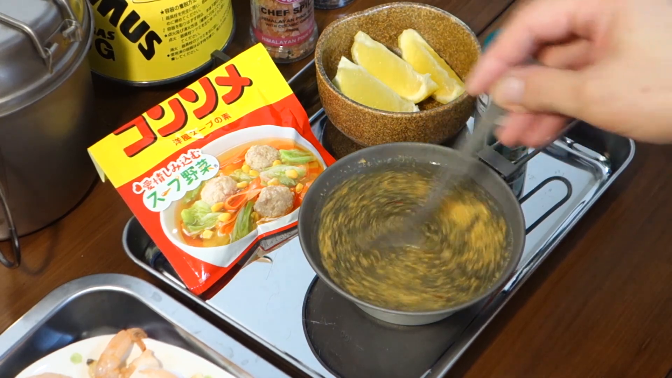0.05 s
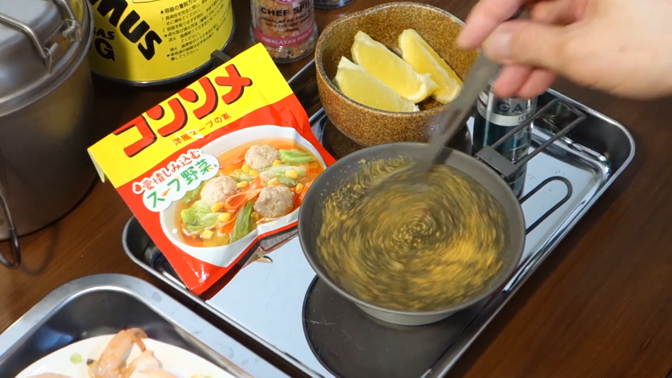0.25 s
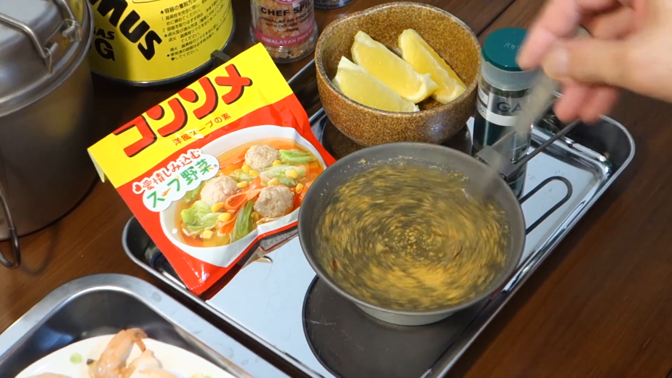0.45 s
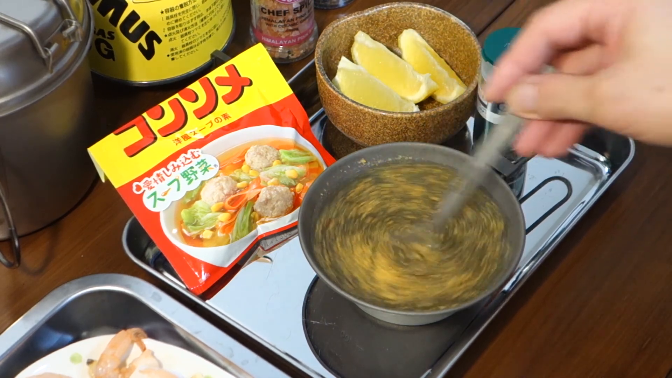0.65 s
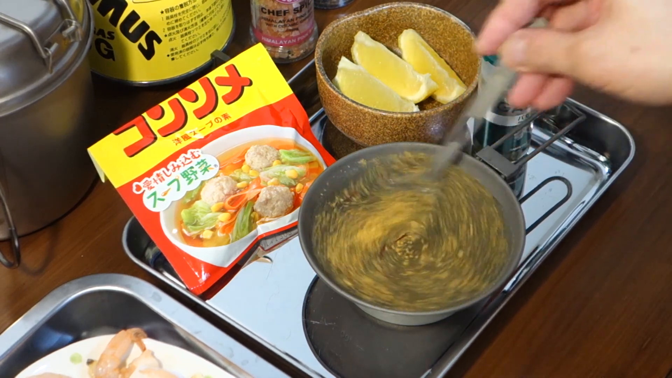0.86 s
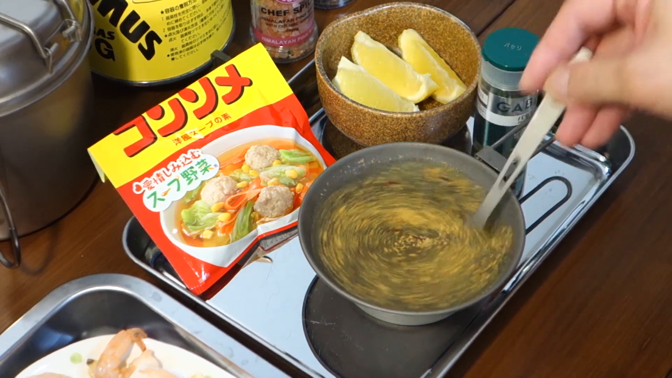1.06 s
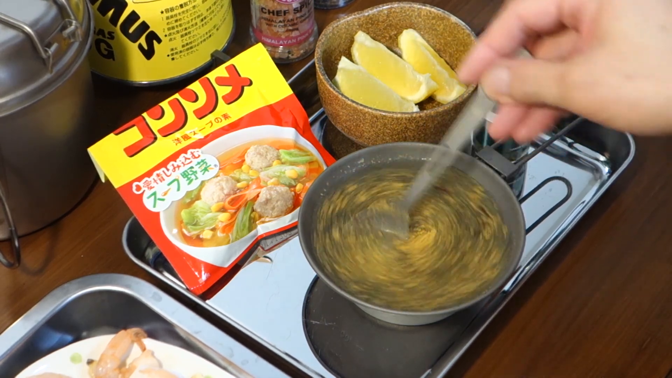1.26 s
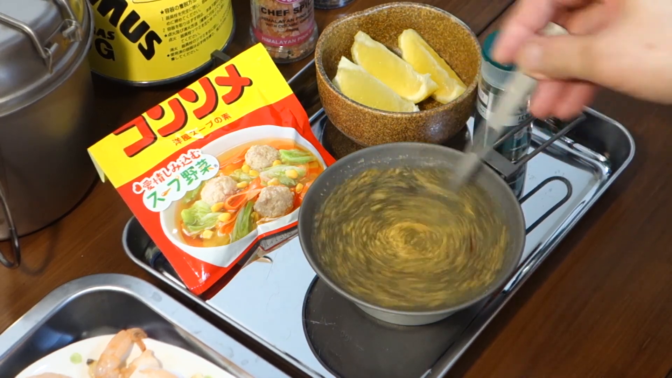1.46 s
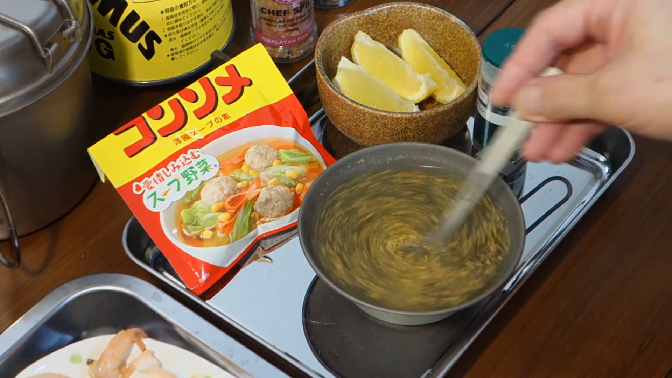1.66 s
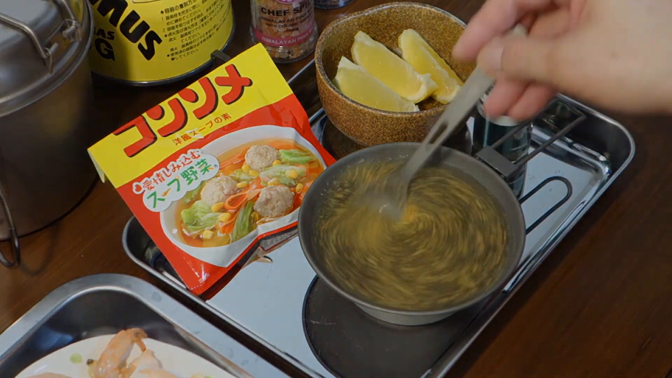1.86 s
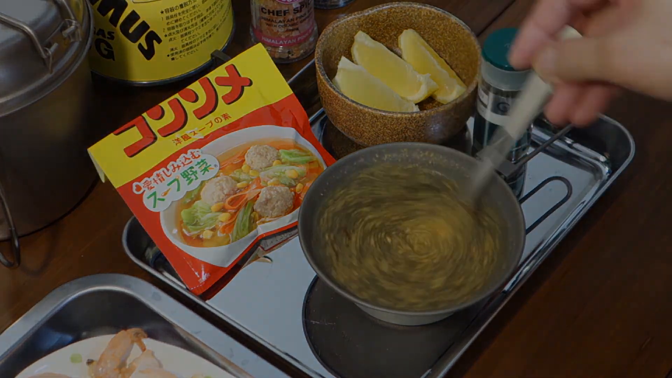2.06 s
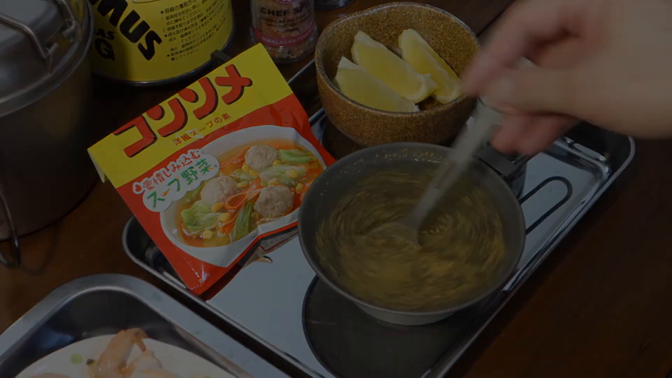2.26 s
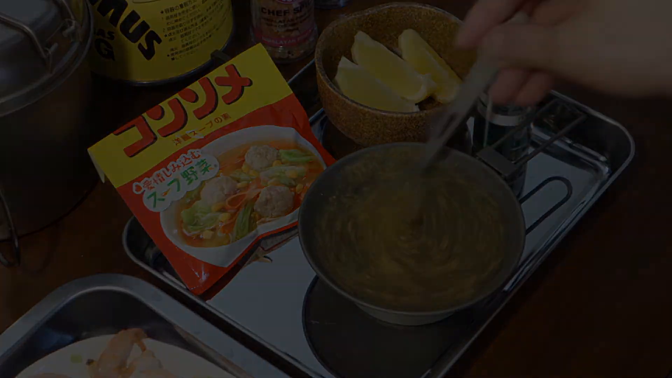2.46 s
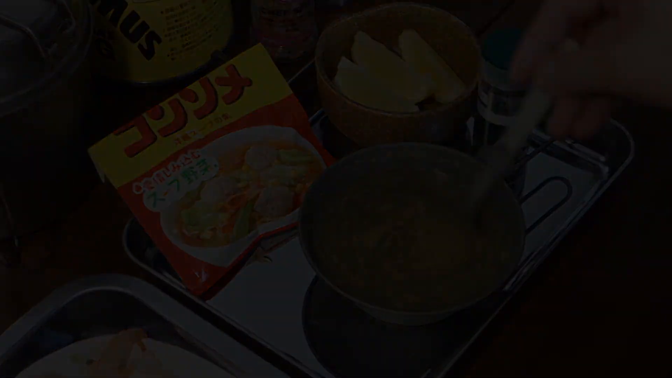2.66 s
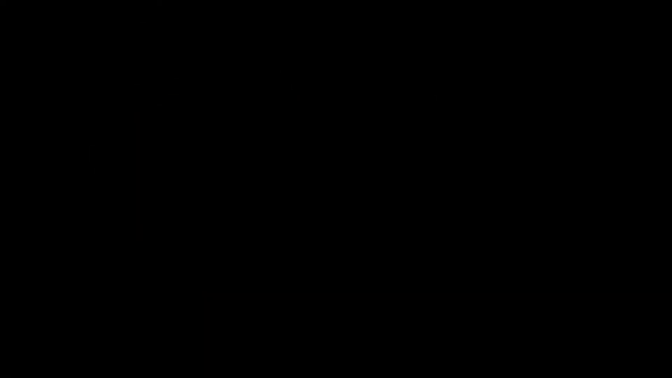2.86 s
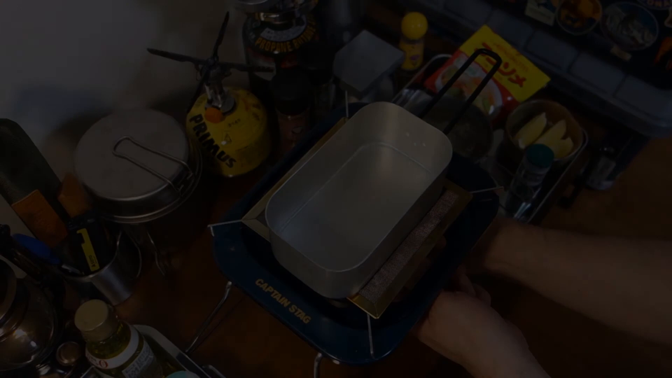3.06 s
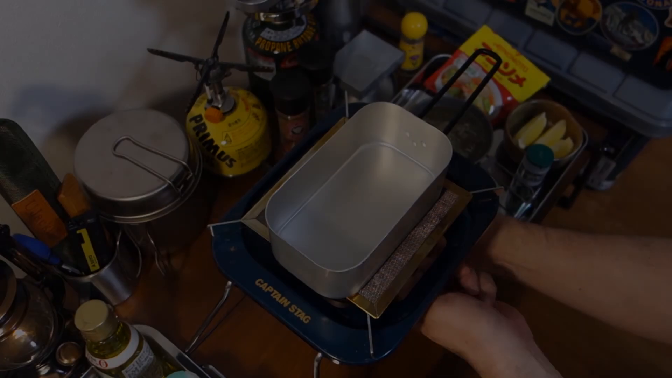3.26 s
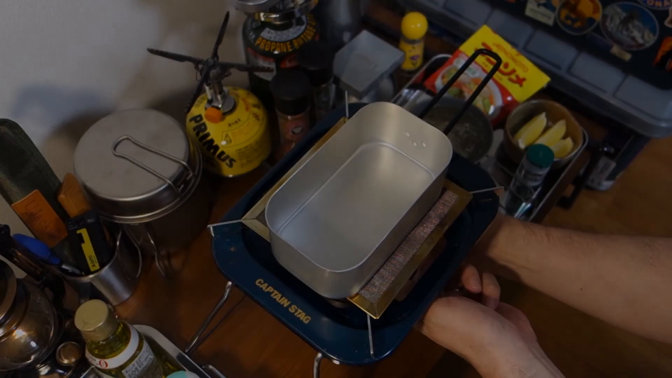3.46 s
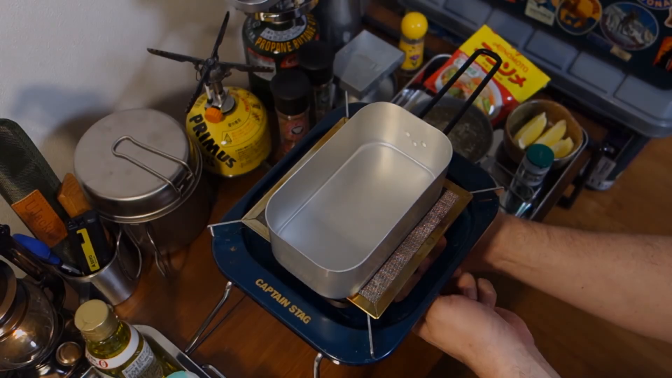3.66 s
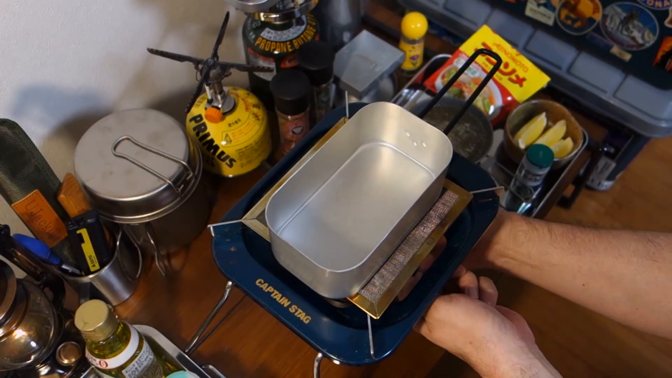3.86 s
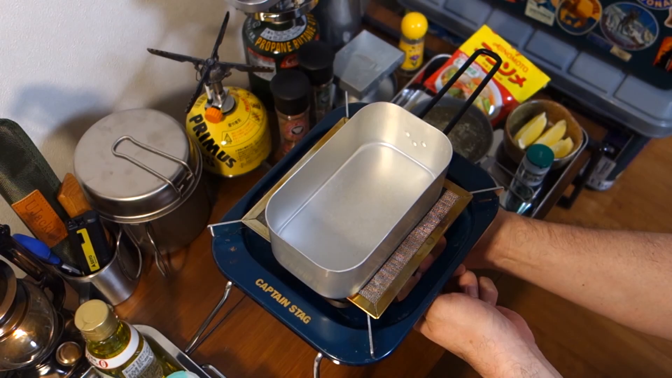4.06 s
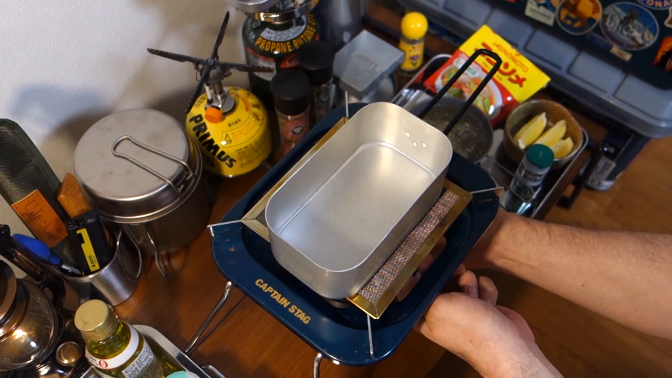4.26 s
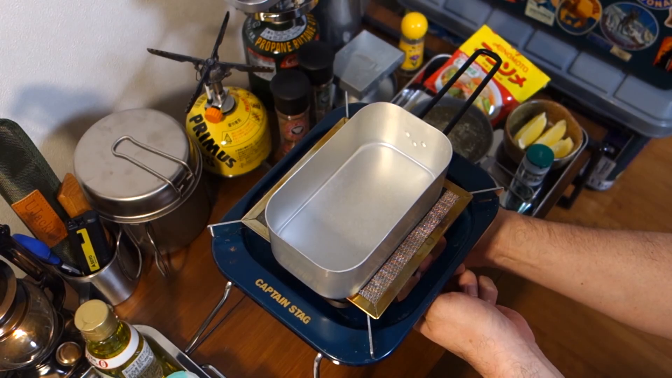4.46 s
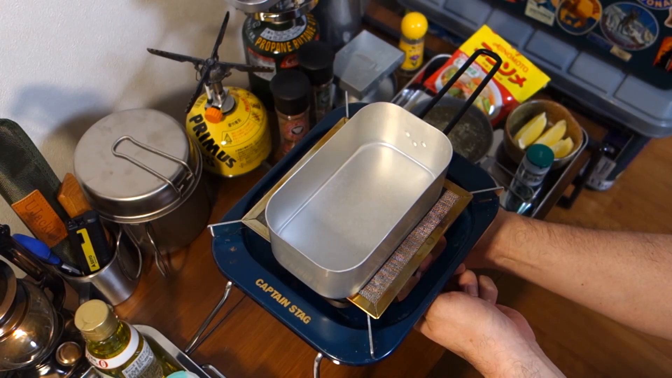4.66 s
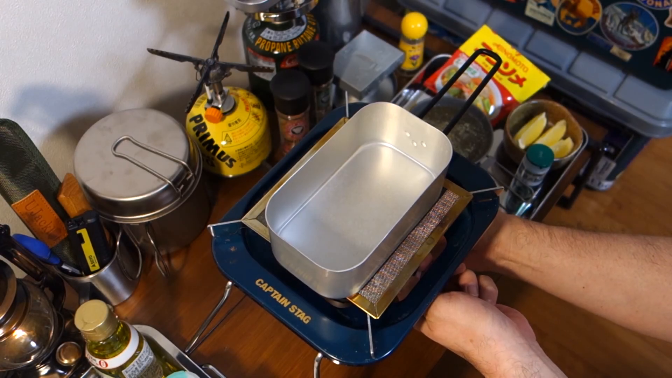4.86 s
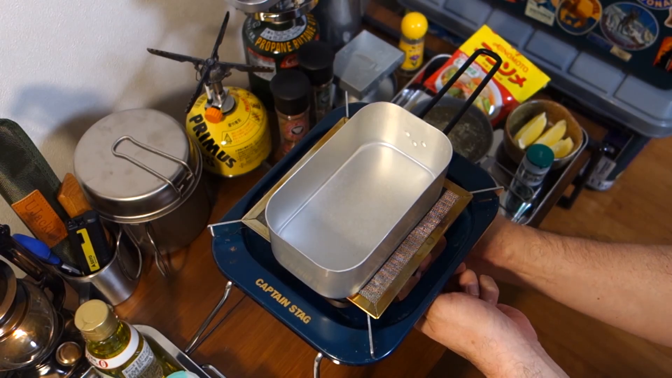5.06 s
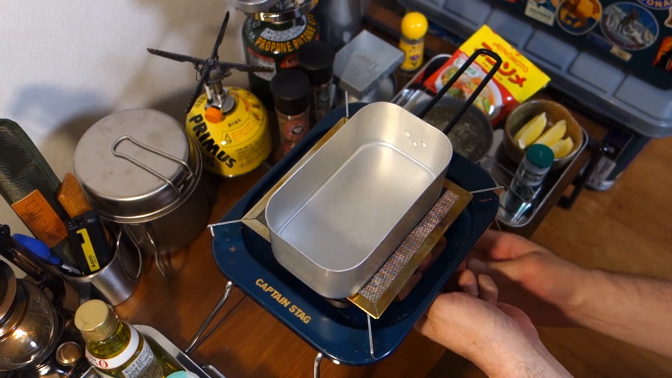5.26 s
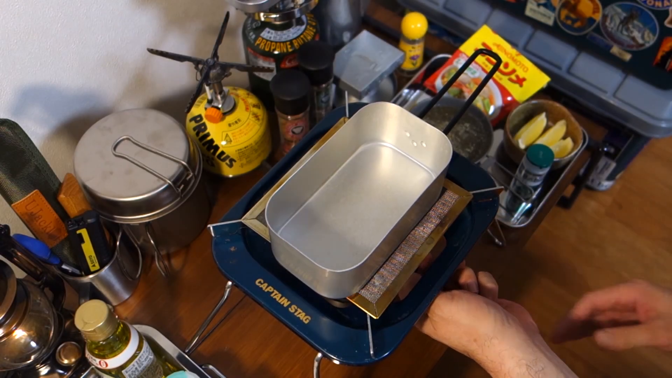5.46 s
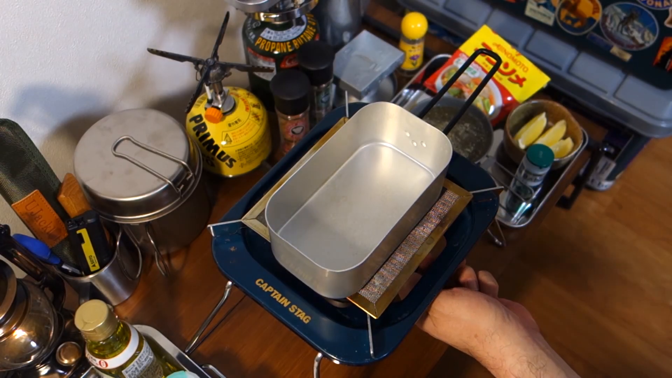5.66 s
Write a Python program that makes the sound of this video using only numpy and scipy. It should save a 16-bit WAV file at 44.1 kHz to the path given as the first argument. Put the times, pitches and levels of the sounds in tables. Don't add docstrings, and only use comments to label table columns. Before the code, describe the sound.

Gritty metallic stirring with clinks in a quiet humming room fades away, then a faint gas hiss and two sharp, rattling metal clicks fade in.

```python
import sys
import numpy as np
from scipy import signal
from scipy.fft import rfft, irfft, next_fast_len
from scipy.io import wavfile
from scipy.ndimage import uniform_filter1d

SR = 44100
rng = np.random.default_rng(int(sys.argv[2]) if len(sys.argv) > 2 else 0)


def unload_audio(sound):
    columns = np.transpose(np.atleast_2d(sound))
    steps = np.round(np.clip(columns, -1, 1) * 32767)
    wavfile.write(sys.argv[1], SR, steps.astype(np.int16))


def natural_amplitude(level_db):
    exponent = np.asarray(level_db, float) / 20
    return 10 ** exponent


N = 251370
CUT_S = 2.972

# (f/Hz, width/Hz, level/dB)
BOWL_MODES = [(578, 26, 4), (890, 270, -7.5), (1312, 15, -14), (1510, 46, 0), (1750, 35, -2),
              (1950, 43, -7), (2114, 51, -10), (2266, 53, -2.5), (2462, 64, -6.5), (2654, 77, -6),
              (3090, 80, -1), (3510, 56, -14), (3864, 92, -4), (4154, 150, -0.5), (4600, 80, -10),
              (5040, 56, -17), (4900, 190, -12), (5620, 230, -12), (6370, 560, -10), (7170, 240, -23)]
# (t/s, pressure level/dB, contact spot f/Hz, sharpness/dB)
SPOON_LANDINGS = [
    (0.365, -49.5, 2120, -1.5),
    (0.58, -60, 2290, -1),
    (0.934, -50.5, 2700, -2),
    (0.966, -52, 1970, -5),
    (1.468, -61, 2600, 2),
    (1.504, -45.5, 1550, -8),
    (1.677, -44, 1970, -16),
    (2.054, -50, 1850, 1.5),
    (2.298, -43.5, 1980, -12.5),
    (2.54, -42.5, 1900, -1),
]
# (full pressure t/s, hold/s, pressure level/dB, contact spot f/Hz, sharpness/dB)
SPOON_SKIDS = [(0.4, 0.017, -53, 2170, -5), (0.461, 0.035, -43.5, 2330, -1.5),
               (0.529, 0.017, -47, 1880, -3.5), (0.591, 0.025, -48, 2320, -3),
               (1.006, 0.045, -46.5, 2480, 0.5), (1.08, 0.031, -45.5, 2320, 1),
               (1.155, .005, -51.5, 2350, -13), (1.543, 0.005, -45.5, 1660, -14),
               (1.574, 0.0056, -51, 2090, 4), (1.594, 0.011, -53, 1570, -19),
               (2.088, 0.019, -44, 1780, -8.5), (2.363, 0.018, -51.5, 2030, -3.5),
               (2.642, 0.023, -41, 1950, -5), (2.693, 0.0068, -44.5, 2140, -1),
               (2.711, 0.0054, -46, 2200, -15)]


def unit(x):
    return x / np.sqrt(np.mean(x ** 2))


def colour(x, shape):
    size = next_fast_len(x.shape[-1])
    hz, db = np.transpose(shape)
    f = np.maximum(np.fft.rfftfreq(size, 1 / SR), 1)
    gain = natural_amplitude(np.interp(np.log(f), np.log(hz), db))
    return irfft(rfft(x, size) * gain, size)[..., :x.shape[-1]]


def band(x, lo_hz, hi_hz):
    edges = [lo_hz, min(hi_hz, SR / 2.1)]
    return signal.sosfilt(signal.butter(2, edges, "band", fs=SR, output="sos"), x)


def ring(x, hz, width):
    r = np.exp(-np.pi * width / SR)
    w = 2 * np.pi * hz / SR
    return signal.lfilter([np.sin(w)], [1, -2 * r * np.cos(w), r * r], x)


def walk(rate):
    k = int(SR / rate)
    steps = np.repeat(rng.standard_normal(N // k + 1), k)
    return unit(uniform_filter1d(uniform_filter1d(steps, k), k)[:N])


def slips(rate, spread_db, size):
    when, sign, strength = rng.random((3, size))
    clicks = (when < rate / SR) * np.sign(sign - 0.5)
    return unit(clicks * natural_amplitude(-spread_db * np.log(1 - 0.98 * strength)))


def even(x, span):
    return x / np.sqrt(uniform_filter1d(x ** 2, int(span * SR)))


def pair(shape, ports):
    mid, side = colour(rng.standard_normal((2, N)), shape)
    return np.array([mid, colour(side, ports)]) / np.std(band(mid, 96, 2000))


def hum():
    # (t/s, length/s, level/dB)
    spells = [
        (0.0, 0.061, -61.5),
        (0.246, 0.65, -68.5),
        (1.024, 0.84, -65),
        (2.003, 0.59, -66.5),
        (3.202, .07, -59),
        (3.493, 0.68, -60.5),
        (4.252, 0.44, -61.5),
        (4.797, 0.071, -71),
        (5.13, 0.24, -59.5),
        (5.44, 0.18, -65),
    ]
    edge_s = 0.088
    t = np.arange(N) / SR
    tone = np.sin(2 * np.pi * np.cumsum(289 + 8.58 * walk(25)) / SR)
    level = 0
    for s, length, db in spells:
        inside = np.minimum(t - s, s + length - t)
        level = level + natural_amplitude(db) * np.clip(inside / edge_s + 0.5, 0, 1)
    return tone * natural_amplitude(1.2 * walk(20)) * level


def room_tone():
    # (f/Hz, level/dB)
    air_colours = [
        [(15, -74), (25, -55.5), (80, -29.5), (164, -7.5), (248, -9), (282, -5.5), (384, -4.5), (471, -7),
         (642, 0.5), (749, -7), (1390, -6), (5040, -24.5), (9360, -26.5), (11800, -33), (15300, -76),
         (22000, -120)],
        [(15, -69), (25, -54), (86, -32), (148, -10), (248, -12), (289, -2.5), (329, -11.5), (550, -6.5),
         (831, -9), (1580, -11), (1940, -14.5), (4910, -28.5), (7230, -27.5), (11800, -35.5), (15300, -69),
         (22000, -120)],
    ]
    # (f/Hz, level/dB)
    far_ports = [(60, -16), (110, -28.5), (200, -19.5), (350, -17), (630, -14), (1140, -10.5), (2060, -7.5),
                 (3720, -4), (6710, 0), (12100, 3)]
    # (f/Hz, width/Hz, level over the room/dB)
    wall_modes = [(395, 8.2, -13.5), (510.5, 7.1, -15.5), (647, 18, -19), (765, 13, -16.5), (916, 29, -16)]
    first_db, second_db = -57, -56.5
    t = np.arange(N) / SR
    first, second = (pair(shape, far_ports) for shape in air_colours)
    standing = 0
    for hz, width, db in wall_modes:
        standing = standing + natural_amplitude(db + 1.8 * walk(5.03)) * unit(ring(rng.standard_normal(N), hz, width))
    first[0] += standing
    second[0] += standing
    out = np.where(t < CUT_S, first * natural_amplitude(first_db), second * natural_amplitude(second_db)) * natural_amplitude(1.42 * walk(5.91))
    out[0] += hum()
    return out


def chirps():
    # (t/s, level/dB, f/Hz, length/s)
    calls = [
        (0.01, -68, 3920, 0.088),
        (0.776, -67, 3920, 0.085),
        (1.375, -73, 3750, .06),
    ]
    t = np.arange(N) / SR
    out = np.zeros(N)
    for s, db, hz, length in calls:
        swell = np.exp(-((t - s) / length * 2) ** 2)
        out += natural_amplitude(db) * unit(ring(rng.standard_normal(N), hz, 160)) * swell
    return out


def taps():
    # (t/s, peak level/dB, struck spot f/Hz, edge level/dB)
    hits = [(0.365, -39, 2100, -13), (0.5862, -33.5, 4150, -5), (0.9355, -38.5, 4240, -61),
            (0.9675, -51, 1530, -35), (1.0791, -28, 3750, -45), (1.4703, -36, 2880, -10.5),
            (1.5107, -28, 1510, -20), (1.545, -41, 1880, -18.5), (1.5754, -30, 3100, -22),
            (1.681, -29.5, 2415, -20), (2.056, -35, 1870, -21), (2.2988, -49, 2170, -4),
            (2.5422, -30.5, 1670, -21), (2.721, -29, 2190, -31), (0.414, -32, 865, -50),
            (0.436, -29.5, 845, -50), (0.598, -31.5, 956, -50)]
    out, t = np.zeros(N), np.arange(SR // 8) / SR
    for s, db, hz, edge_db in hits:
        crack = rng.standard_normal(len(t)) * np.exp(-t / 0.0075)
        near = 0
        for f, w, g in BOWL_MODES:
            near = near + ring(crack, f, 2.5 * w) * natural_amplitude(g) / (1 + ((f - hz) / 900) ** 2)
        knock = 1.24 * np.sin(2 * np.pi * hz * t) * np.exp(-t / 0.012)
        body = band(near / np.abs(near).max() + knock, 640, 13000)
        edge = natural_amplitude(edge_db + 12) * band(crack, 3300, 14000)
        k = int(s * SR)
        out[k:k + len(t)] += natural_amplitude(db - 12) * (body + edge + 0.1 * band(crack, 500, 3700))
    return out


def pressure(level_db, share, slope):
    swell_db_s, lift_db_s, jolt_db_s = 170, 234, 329
    t, power = np.arange(int(CUT_S * SR)) / SR, 0
    for s, db, hz, sharp_db in SPOON_LANDINGS:
        power += (t > s) * natural_amplitude(db + share * sharp_db - slope * jolt_db_s * np.abs(t - s)) ** 2
    for s, hold, db, hz, sharp_db in SPOON_SKIDS:
        landed = max(row[0] for row in SPOON_LANDINGS if row[0] < s)
        loss_db = swell_db_s * np.maximum(s - t, 0) + lift_db_s * np.maximum(t - s - hold, 0)
        power += (t > landed) * natural_amplitude(db + share * sharp_db - slope * loss_db) ** 2
    return np.pad(natural_amplitude(level_db) * np.sqrt(power), (0, N - len(t)))


def strokes():
    # (f/Hz, level/dB)
    grit = [(240, -43), (400, -10), (1060, -14), (2190, -0.5), (3860, -6.5), (4500, -13.5), (10200, -14.5),
            (11800, -23.5), (15300, -50), (22000, -120)]
    # (level/dB, share of sharpness, slope factor)
    answers = [
        (-2, 0.028, 1.14),
        (-9.5, -0.051, 0.66),
        (-2.6, 1.09, 1.75),
        (-5.5, 0.94, 1.63),
    ]
    drive = slips(rate=7500, spread_db=2.5, size=N) * natural_amplitude(1.6 * walk(90))
    path = np.array(sorted([(row[0], row[-2]) for row in SPOON_LANDINGS + SPOON_SKIDS]))
    spot = np.interp(np.arange(N) / SR, path[:, 0], path[:, 1])
    modes = 0
    for hz, width, db in BOWL_MODES:
        boost_db = 12.3 / (1 + (np.log(hz / spot) / 0.12) ** 2)
        gain = natural_amplitude(db + 5.7 * walk(44.97) + boost_db)
        modes = modes + gain * unit(ring(drive, hz, 1.28 * width)) * np.sqrt(width)
    sound = unit(modes) + natural_amplitude(-3.5) * unit(colour(drive, grit))
    low = []
    for hz in (450, 1200, 2700, 5000):
        low.append(signal.sosfiltfilt(signal.butter(2, hz, fs=SR, output="sos"), sound))
    wall, belly, rim, top = low[2] - low[1], low[1] - low[0], low[3] - low[2], sound - low[3]
    parts = wall, belly, rim, top
    return sum(even(part, span=0.042) * pressure(*answer) for part, answer in zip(parts, answers))


def knocks():
    # (t/s, level/dB, f/Hz, decay rate per s, swell/s)
    thuds = [
        (3.212, -60, 143.2, 8, 0.018),
        (4.559, -62, 102.7, 6.9, 0.073),
    ]
    t = np.arange(N) / SR
    out = np.zeros(N)
    for s, db, hz, decay, swell in thuds:
        age = np.maximum(t - s, 0)
        envelope = (1 - np.exp(-age / swell)) * np.exp(-age * decay)
        out += natural_amplitude(db) * np.sin(2 * np.pi * hz * age) * envelope
    return out


def valve_tick():
    # (f/Hz, width/Hz, level/dB)
    valve_modes = [(290, 120, -7), (900, 440, -6), (1600, 380, 1.5), (4700, 1100, -6.5), (10400, 2000, -15)]
    start_s, level_db, t60_s = 3.2125, -49, 0.096
    age = np.arange(N) / SR - start_s
    jolt = rng.standard_normal(N) * (age > 0) * np.exp(-np.abs(age) * np.log(1000) / t60_s)
    tick = sum(natural_amplitude(db) * unit(ring(jolt, hz, width)) for hz, width, db in valve_modes)
    tick = band(tick, 160, 12000)
    return natural_amplitude(level_db) * tick / np.abs(tick).max() * 3


def curve(rows):
    s, db = np.transpose(rows)
    return natural_amplitude(np.interp(np.arange(N) / SR, s, db, left=-200))


def gas():
    # (t/s, level/dB)
    flow = [
        (3.7, -88),
        (3.82, -70),
        (4.1, -67),
        (4.4, -67),
        (5.0, -71),
        (5.7, -72),
    ]
    # (f/Hz, width/Hz, unlit level/dB, alight level/dB)
    burner = [(2640, 790, -1, -3.5), (5850, 300, -8, -4), (6130, 520, -5, -2.5), (7770, 550, -4.5, -11),
              (8390, 590, -2, -0.5), (8860, 560, -3.5, -2.5), (9270, 580, -11, -2.5),
              (10830, 500, -14, -13)]
    lights_s = 4.83
    noise = rng.standard_normal((2, N))
    lit = np.arange(N) / SR > lights_s
    hiss = 0
    for hz, width, cold, hot in burner:
        gain = natural_amplitude(np.where(lit, hot, cold) + 1.1 * walk(7.7))
        hiss = hiss + gain * unit(ring(ring(noise, hz, width), hz, width))
    mid, side = hiss
    return np.array([mid, natural_amplitude(-4.5) * side]) * curve(flow)


def snaps():
    # (t/s, level/dB, rattle length/s, time for the treble to fall 60 dB/s)
    clicks = [
        (4.4155, -30.5, 0.046, 0.26),
        (4.8225, -31.5, 0.0056, 0.096),
    ]
    # (time to fall 60 dB/s, swell/s, level/dB)
    bodies = [
        (0.26, 0.006, -3),
        (.22, 0.0038, -6),
    ]
    # (f/Hz, level/dB)
    rattle_colours = [
        [(120, -57), (200, -20), (291, -19), (683, -27), (867, 0), (1120, -8), (2110, -7), (2770, -9.5),
         (5960, -11.5), (11800, -10), (15300, -44), (22000, -120)],
        [(120, -42), (200, -3), (424, -25), (913, -1), (1500, -20), (2110, -9.5), (4700, -3.5), (5110, -11),
         (6070, -6.5), (11800, -23), (15300, -58), (22000, -120)],
    ]
    metal_hz = [295, 587, 880, 965, 1040, 1222, 1265, 1317, 1705, 2073, 2160, 2279, 2441, 2612, 2923, 3173,
                3350, 3731, 3950, 4430, 4699, 5240, 5879, 6014, 6857, 7000, 7500, 8867, 10933, 11051]
    metal_db = [
        [-6.5, -9.5, 0.12, -0.36, -2, -17, -4, -3, -14, 1.5, -8, -6, -10, -22, -12, -17, -5.5, -30, -26, -4, -9,
         -25, -15, -0.5, -17, -18, -4, -25, -4, -2],
        [-2.5, -8, -1.4, -0.5, -15, -14, -13, -5.5, -25, -25, -14, -20, -23, -24, -7, -24, -10, -15, -7, -19,
         -12, -20, -17, -1, -5, -3, -4, -29, -19, -18],
    ]
    out, t = np.zeros(N), np.arange(SR // 2) / SR
    for click, dull_body, shape, wake in zip(clicks, bodies, rattle_colours, metal_db):
        s, db, hold, bright = click
        dull, swell, dull_db = dull_body
        drive = slips(rate=9000, spread_db=-1.0, size=len(t))
        after = np.maximum(t - hold, 0) * np.log(1000)
        metal = 0
        for hz, g in zip(metal_hz, wake):
            song = np.sin(2 * np.pi * (hz * t + rng.random()))
            metal = metal + natural_amplitude(g) * (song + 0.57 * unit(ring(drive, hz, 0.024 * hz)))
        rattle = unit(colour(drive, shape)) + natural_amplitude(-1.0) * unit(metal)
        low, middle, high = band(rattle, 220, 1500), band(rattle, 1500, 6500), band(rattle, 6500, 13000)
        settle = 0.59 + 0.13 * np.exp(-after / 0.049)
        crack = 1 + 1.2 * np.exp(-t / 0.0072)
        high = high * np.exp(-after / bright) * crack * settle
        middle = middle * np.exp(-after / np.sqrt(bright * dull)) * settle
        low = low * np.exp(-after / dull) * (1 - np.exp(-t / swell))
        k = int(s * SR)
        out[k:k + len(t)] += natural_amplitude(db + 0.5) * (high - middle + natural_amplitude(dull_db) * low)
    return out


def fade():
    fade_out_s, silent_s, fade_in_s = 1.38, 2.966, 1.19
    start = natural_amplitude(-20)
    t = np.arange(N) / SR
    falling = np.clip((silent_s - t) / fade_out_s_to_end(silent_s, fade_out_s), 0, 1) ** 1.04
    rising = np.minimum(start + (1 - start) * (np.abs(t - CUT_S) / fade_in_s) ** 0.83, 1)
    return np.where(t < CUT_S, falling, rising)


def fade_out_s_to_end(silent_s, fade_out_s):
    return silent_s - fade_out_s


def scene():
    # (f/Hz, level/dB)
    near_ports = [(60, -14), (110, -18), (200, -29), (350, -18), (630, -16), (1140, -14.5), (2060, -10.5),
                  (3720, -6), (6710, -3), (12100, 1.5)]
    room_t60_s, room_gain = 0.29, natural_amplitude(-9.5)
    near = band(taps() + strokes() + snaps(), 273, 24000) + chirps() + knocks() + valve_tick()
    t = np.arange(SR // 2) / SR
    tails = rng.standard_normal((2, len(t))) * np.exp(-t * np.log(1000) / room_t60_s) * (t > 0.003)
    walls = signal.fftconvolve(near, tails[0] / np.linalg.norm(tails[0]))[:N]
    scatter = rng.standard_normal(len(t)) * np.exp(-t / 0.011) * 0.056
    spread = tails[1] / np.linalg.norm(tails[1]) * room_gain + scatter
    side = colour(signal.fftconvolve(near, spread)[:N], near_ports)
    mid, side = np.array([near + room_gain * walls, side]) + room_tone() + gas()
    return np.array([mid + side, mid - side]) * fade()


def roll_off(x):
    return signal.sosfilt(signal.butter(12, 12700, fs=SR, output="sos"), x)


def record(dry):
    mix = signal.sosfilt(signal.ellip(12, 0.3, 55, 11640, fs=SR, output="sos"), dry)
    return roll_off(mix)


dry = scene()
out = record(dry)
unload_audio(out)
```